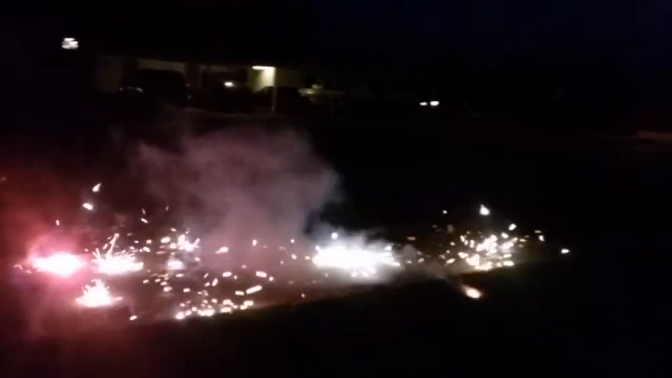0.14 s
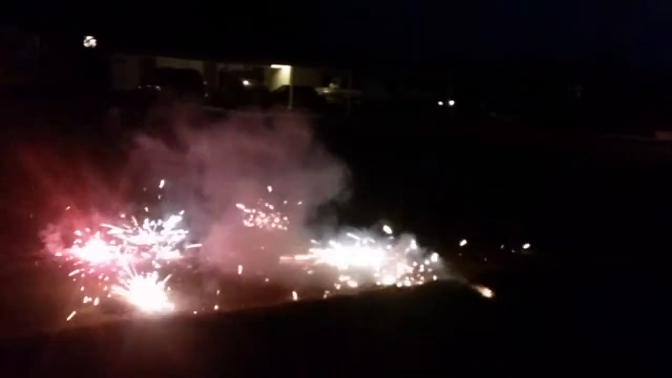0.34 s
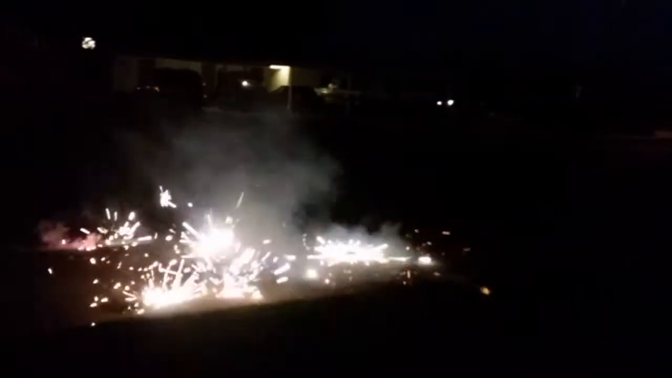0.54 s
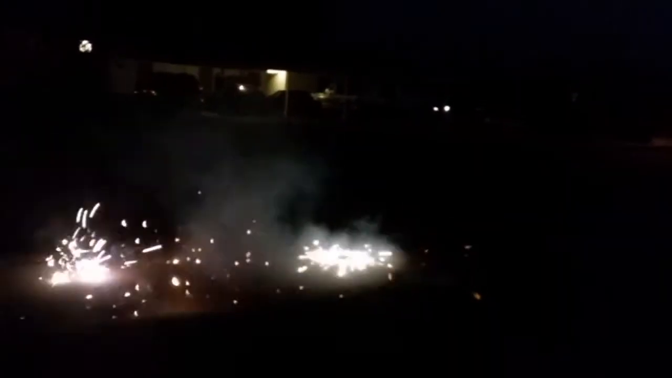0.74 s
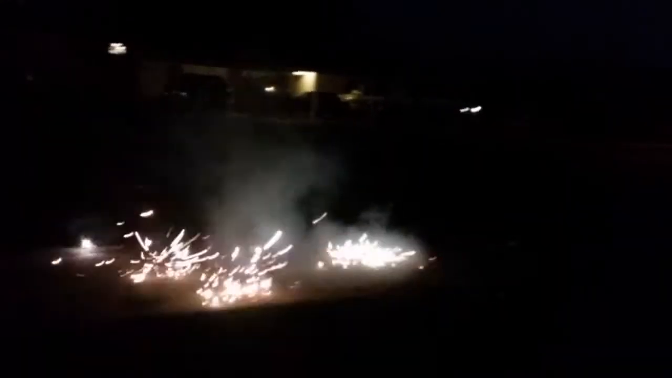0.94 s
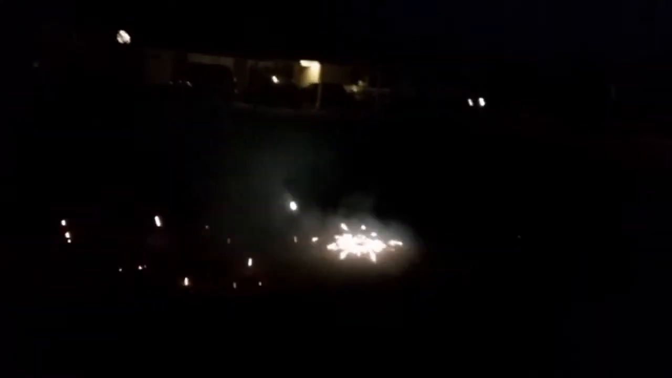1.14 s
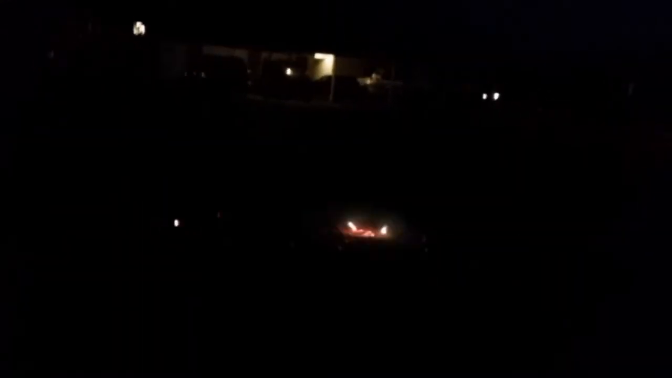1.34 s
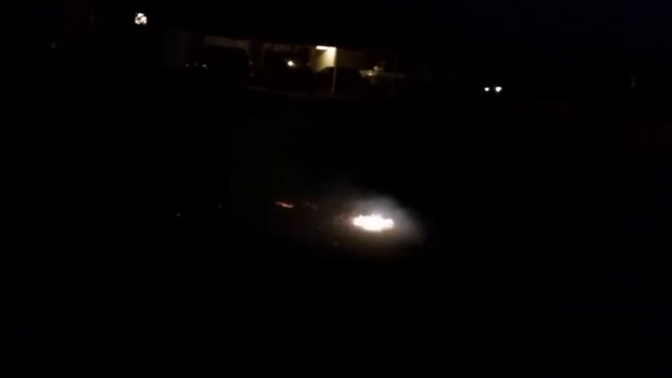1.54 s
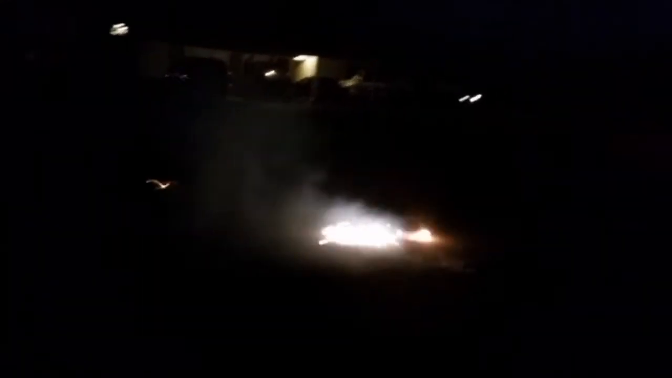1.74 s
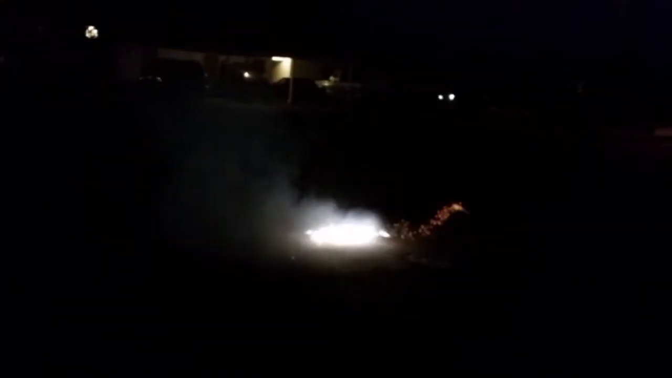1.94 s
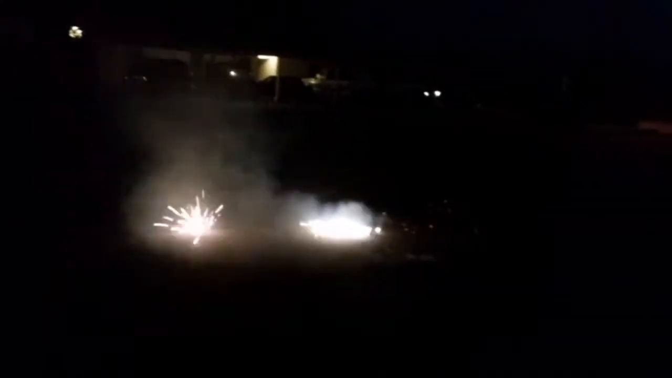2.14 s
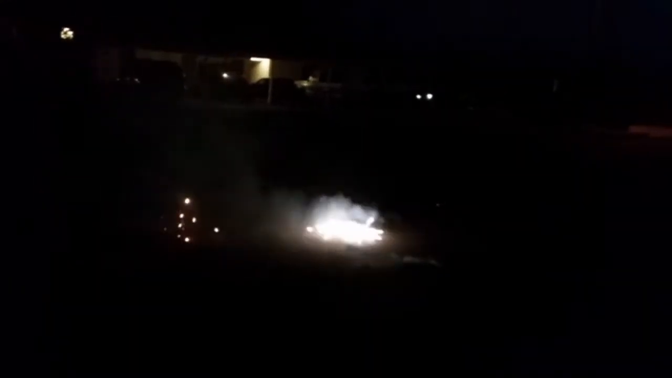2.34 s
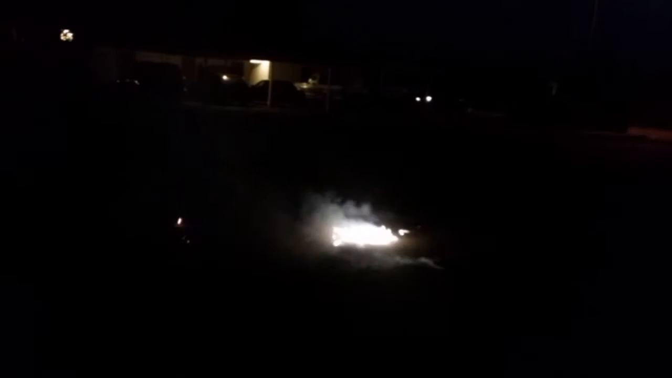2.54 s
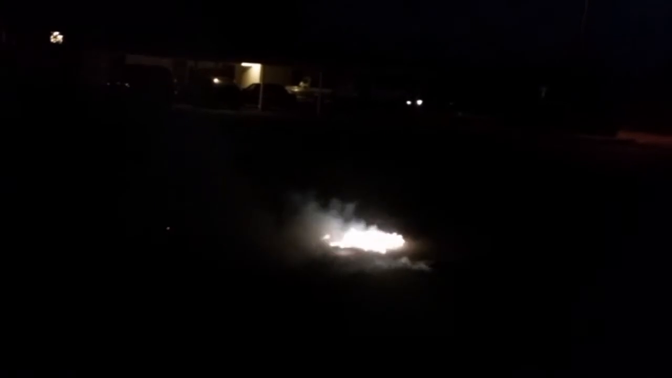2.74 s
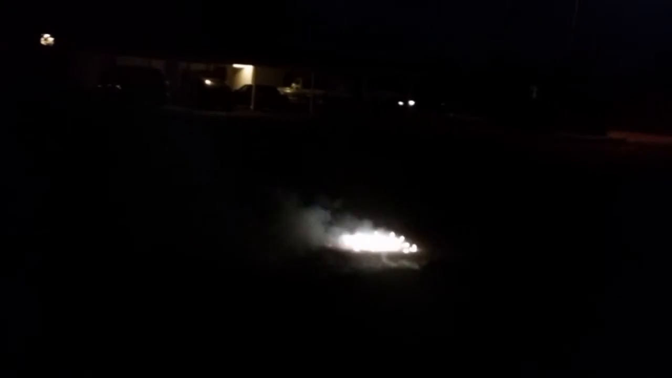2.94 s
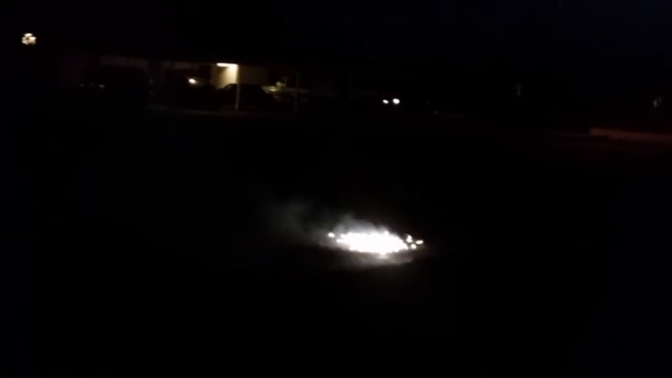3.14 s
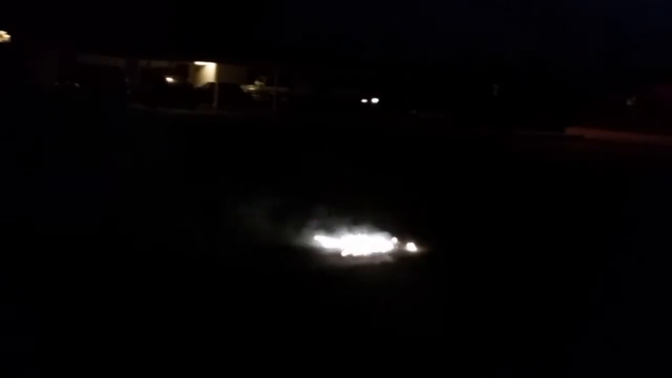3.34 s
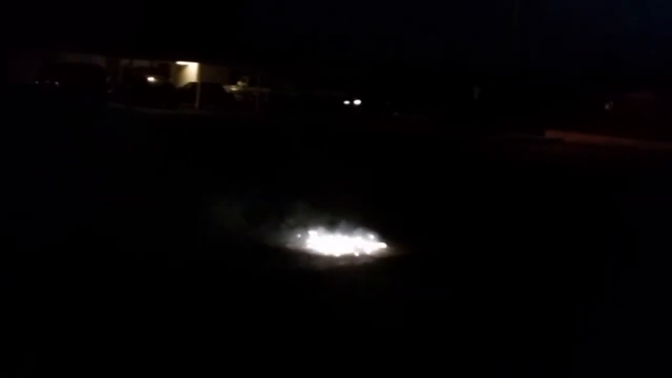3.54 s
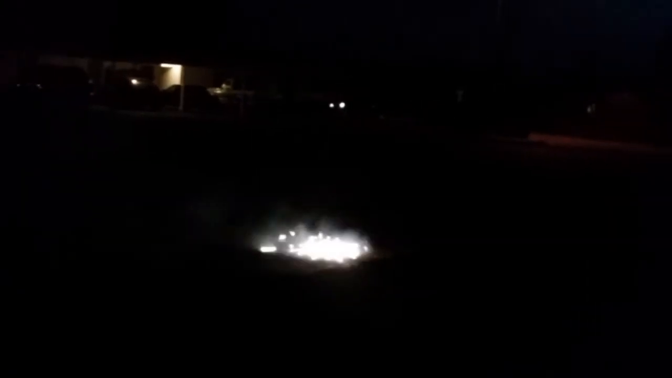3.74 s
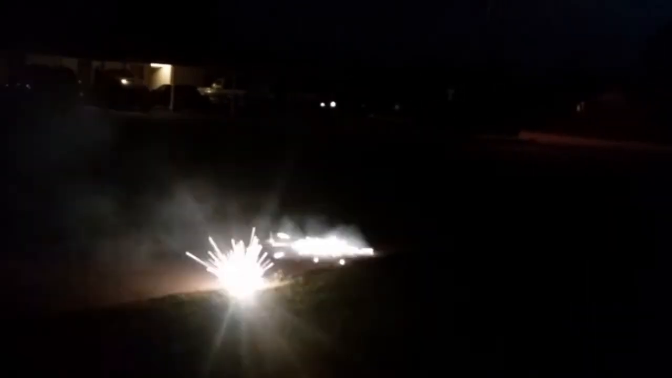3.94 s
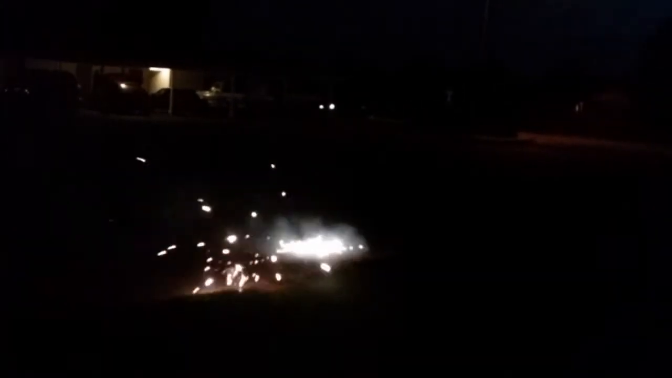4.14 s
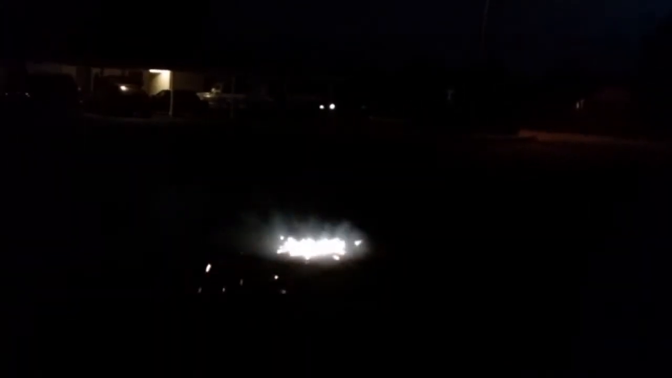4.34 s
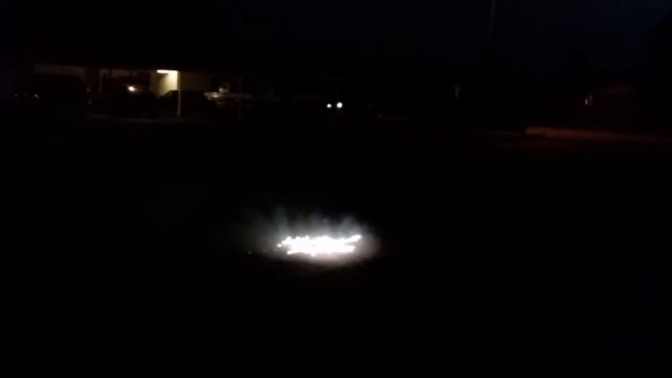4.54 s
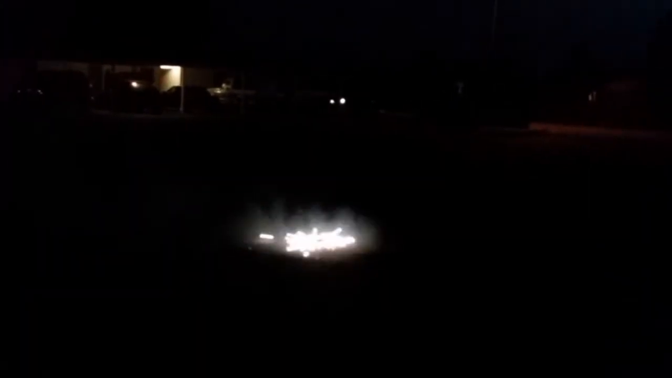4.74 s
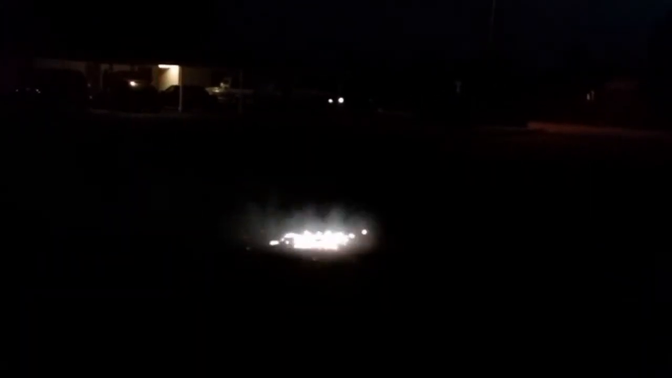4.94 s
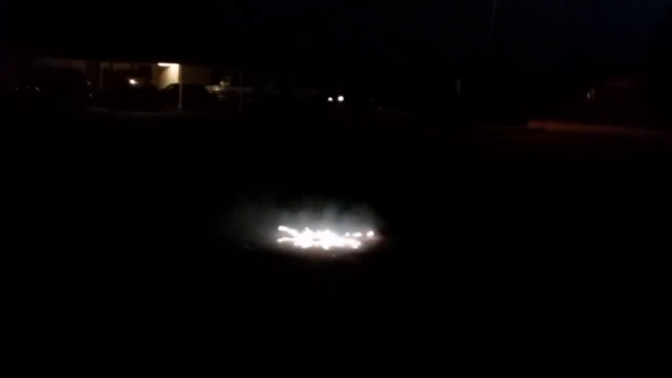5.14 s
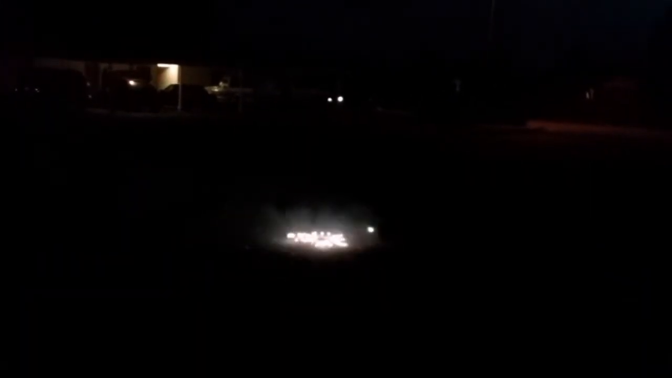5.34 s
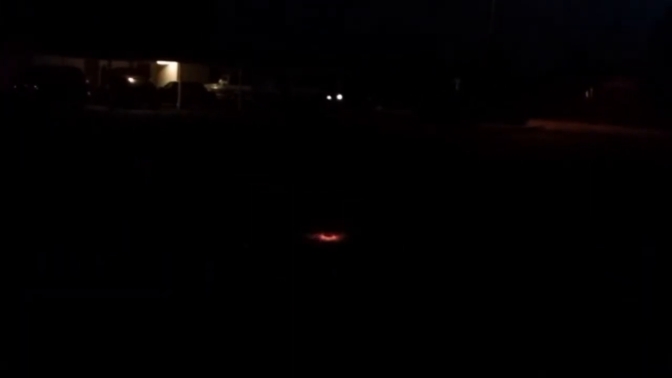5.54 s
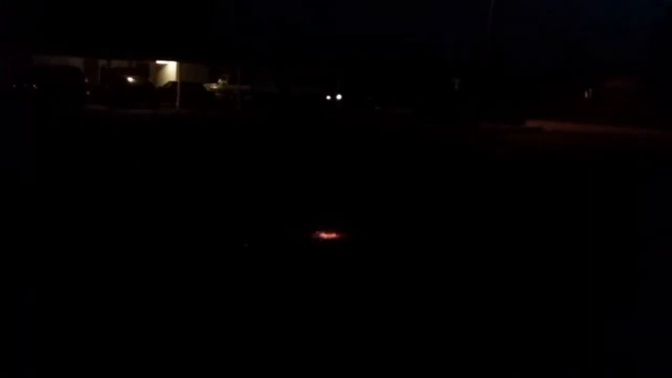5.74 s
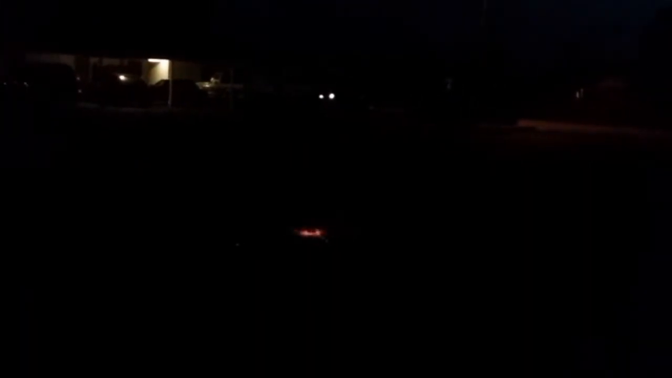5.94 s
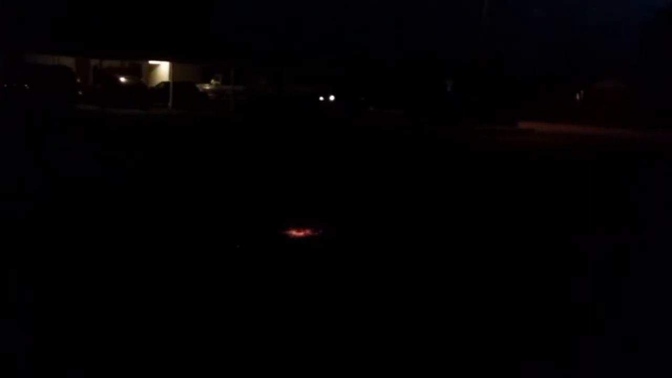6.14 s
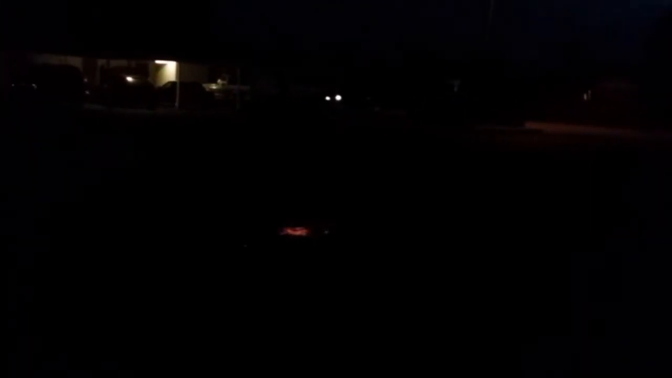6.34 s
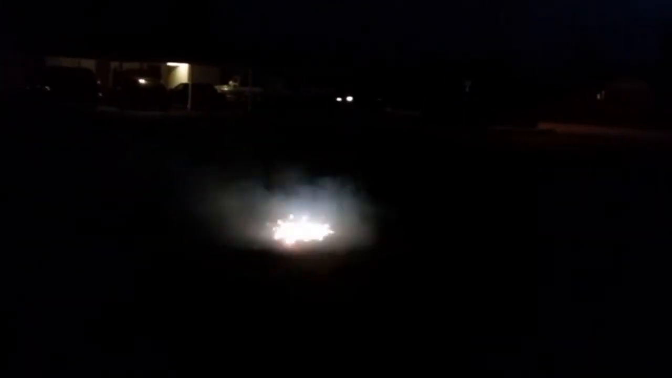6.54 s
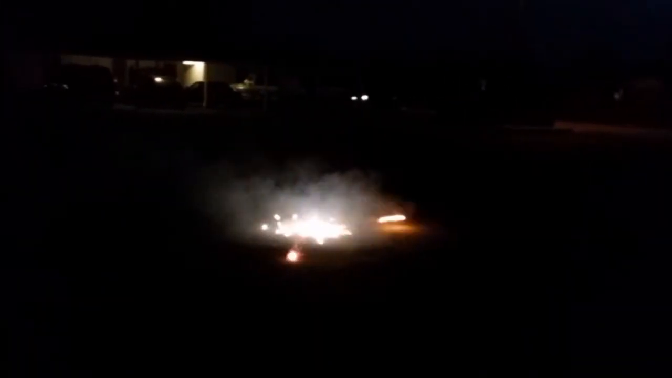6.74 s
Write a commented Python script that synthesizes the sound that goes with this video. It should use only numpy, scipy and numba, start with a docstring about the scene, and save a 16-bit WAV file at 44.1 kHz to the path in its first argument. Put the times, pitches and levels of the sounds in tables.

```python
"""A piercing whistle, already sounding, opens three burns of a ground spinner on a lawn at night. Its pitch
sinks as the empty part of the tube grows, and lifts as a charge runs out. The circling nozzle wobbles pitch
(Doppler) and loudness (beam) each turn; its gas jet is shaped noise. The casing ticks, other fireworks crackle,
a charge pops alight, a low hum follows the spin and houses echo, in faint outdoor air. Two microphones hear it
unequally; a clipping converter folds overtones down and a limiter follows."""
import sys
import numpy as np
from scipy import signal
from scipy.fft import rfft, irfft, next_fast_len
from scipy.io import wavfile
from scipy.ndimage import uniform_filter1d
from numba import njit

SR = 44100
rng = np.random.default_rng(int(sys.argv[2]) if len(sys.argv) > 2 else 0)


def inscribe(sig):
    """Save sig as 16-bit PCM at rate SR to the path in sys.argv[1].

    A 1-D sig is mono; a 2-D sig holds one channel per row.
    Samples are clipped to [-1, 1] before scaling.
    """
    pcm = np.round(np.clip(np.atleast_2d(sig).T, -1, 1) * 32767)
    wavfile.write(sys.argv[1], SR, pcm.astype(np.int16))


def nominal_scale(level):
    """Amplitude ratio for a level in decibels (scalar or array-like)."""
    x = np.asarray(level, float) / 20
    return 10 ** x


N = 299880  # samples


def curve(table, at):
    """Linear interpolation: every later column of a table read along its first column."""
    first, *columns = np.transpose(table)
    return [np.interp(at, first, c) for c in columns]


def colour(x, points):
    """Spectral shaping: a zero-phase filter through (frequency [Hz], gain [dB]) on a log axis."""
    hz, db = np.transpose(points)
    n = next_fast_len(x.shape[-1] + 4096)
    f = np.arange(n // 2 + 1) * SR / n + 1  # the 1 Hz offset keeps the log finite
    gain = nominal_scale(np.interp(np.log(f), np.log(hz), db))
    return irfft(rfft(x, n) * gain, n)[..., :x.shape[-1]]


def level(x, db):
    """Power normalisation: scale to an rms level [dB]."""
    return x * nominal_scale(db) / np.sqrt(np.mean(x ** 2))


def walk(rate):
    """Band-limited fluctuation: random values held 1 / rate s and averaged twice; spread near 1."""
    hold = int(SR / rate)
    steps = np.repeat(rng.standard_normal(N // hold + 1), hold)
    return 1.3 * uniform_filter1d(uniform_filter1d(steps, hold), hold)[:N]


def burns():
    """Tube resonance and rotation: pitch, turns, nozzle speed, level, hand turn, dying share and gate."""
    # the empty part of the tube grows, so the tone sinks; the second burn stumbles just after lighting
    # and the tone lifts as a charge runs out: (time [s], frequency [Hz])
    pitch = [(0, 3017), (.05, 3062), (.11, 2909), (.22, 2777), (.55, 2630), (1.36, 2378), (1.44, 2498),
             (1.49, 2585), (1.74, 2585), (1.745, 4380), (1.78, 4290), (1.802, 3950), (1.826, 3900),
             (1.84, 4190), (1.875, 4430), (1.93, 4440), (2.0, 4320), (2.3, 4200), (2.7, 3760), (2.95, 3680),
             (3.2, 3400), (3.45, 3200), (4.2, 2810), (4.75, 2582), (5.12, 2490), (5.52, 2395), (5.58, 2523),
             (6.61, 2523), (6.62, 4440), (6.8, 4355)]
    # the spinner slows on the grass and speeds up as it gets lighter:
    # (time [s], spin rate [turns/s], radius of the nozzle's circle [cm])
    spin = [(0, 25, 9), (.17, 28, 4.3), (.66, 31.5, 5.1), (1.36, 35.35, 4.7), (1.54, 31.1, 5.2),
            (1.84, 25.08, 0), (1.87, 25.08, 3.4), (2.05, 27.04, 3), (2.3, 24.29, 3.8), (2.6, 23.39, 6),
            (2.95, 21.4, 6.3), (3.04, 21.21, 3.2), (3.3, 20.66, 5.6), (3.7, 21.63, 5.1), (4.0, 25.26, 5.3),
            (4.6, 31.99, 5.4), (5.4, 39.21, 4.9), (5.63, 40.2, 4.3), (6.62, 23, 1.6), (6.8, 27.5, 1.5)]
    # burns: (lit [s], out [s], nozzle angle when first heard [turns], level [dB], turn of the hand [rad])
    charges = [(-2.1, 1.535, .41, 1.5, -.35), (1.749, 5.637, .47, 0, 0), (6.629, 7.5, .24, 8, 1.3)]
    catch_db, catch_s = -50, .003  # the tone swells out of near silence
    dying_s, dying_tone_db = .14, -18  # the tone fades as the charge runs out
    t = np.arange(N) / SR
    hz, = curve(pitch, t)
    rate, radius_cm = curve(spin, t)
    rows = np.array(charges)
    lit, out, angle, db, hand = rows[np.searchsorted(rows[:, 0], t) - 1].T
    spun = np.cumsum(rate) / SR
    turns = angle + spun - np.interp(lit, t, spun)
    speed = 2 * np.pi * radius_cm / 100 * rate  # m/s
    dying = np.clip(1 - (out - t) / dying_s, 0, 1)
    db = db + catch_db * np.exp(-(t - lit) / catch_s) + dying_tone_db * dying ** 3.5
    burning = np.clip((out - t) / .006, 0, 1)
    return hz, turns, speed, db, hand, dying, burning


def whistle(hz, turns, speed, lead, dying):
    """Doppler shift and directivity of a circling tube: left and right tone, and one without the beam."""
    # a higher tone beams more sharply:
    # (tube tone [Hz], swing once a turn [ratio], swing twice a turn [ratio], overtone level [dB])
    directivity = [(2310, 0.046, 0.1, 10), (2756, 0.071, 0.17, 3), (2847, 0.39, 0.23, 2.5),
                   (3244, 0.22, .15, -14), (3569, 0.12, .4, -9), (3960, 0.15, 0.38, -17),
                   (4240, 0.44, .75, -18.5)]
    # overtones of the tube:
    # (multiple of the tone, level [dB], beam swing [ratio], loudest at [fraction of a turn])
    overtones = [(2, -21.5, 0.55, 0.37), (3, -28.5, 0.8, 0.3), (4, -29, 1, 0.33)]
    peak_once, peak_twice = 0.16, 0.13  # where the beam peaks, fraction of a turn
    dying_overtone_db = -12  # as the charge runs out, per step above the octave
    once, twice, overtone_db = curve(directivity, hz)
    turn = 2 * np.pi * turns
    doppler = speed / 343 * np.cos(turn)
    # uneven burning shakes the pitch a little
    heard = hz * (1 + doppler + .003 * walk(150) + 0.0087 * twice * walk(70))
    # a short, freshly lit tube sings hoarsely
    heard = heard * (1 + .008 * twice * walk(500))
    phase = 2 * np.pi * np.cumsum(heard) / SR
    beam = 1 - 0.54 * twice + once * np.cos(turn - 2 * np.pi * peak_once)
    beam = beam + twice * np.cos(2 * (turn - 2 * np.pi * peak_twice)) + 0.078 * walk(120)
    both = phase + np.array([lead, np.zeros(N)])
    # a small part a quarter cycle ahead, stronger for a higher tone, part fills the nulls
    tone = beam * np.sin(both) + 0.12 * twice * np.cos(both)
    plain = np.sin(phase)
    for k, db, swing, at in overtones:
        lobe = nominal_scale(db + overtone_db + (k - 2) * dying_overtone_db * dying + 1.7 * walk(90))
        lobe = lobe * (k * heard < .45 * SR)  # silent near and above half the sample rate
        sweep = 1 + swing * np.cos(turn - 2 * np.pi * at)
        sweep = sweep + 0.32 * np.cos(2 * turn - 4 * np.pi * at)
        tone = tone + lobe * sweep * np.sin(k * both + 0.57 * k)
        plain = plain + lobe * np.sin(k * phase)
    return tone, plain, turn


def gas(dying, burning):
    """Turbulent jet noise: broadband hiss with a fine sputter, following the strength of the jet."""
    # spectrum of the hiss: (frequency [Hz], gain [dB])
    spectrum = [(60, -18), (300, -18), (800, -11), (1500, -8), (2500, -6), (4000, -13), (6000, -15.5),
                (12000, -13.5)]
    # strength of the gas jet: (time [s], level [dB])
    strength = [(0, -50.5), (.4, -48), (1.4, -52.5), (1.76, -54), (2.05, -57), (2.25, -52), (2.42, -59),
                (2.62, -55), (2.8, -48), (3.2, -46), (3.4, -41), (3.8, -48), (5.5, -55.5), (6.65, -50),
                (6.8, -49)]
    dying_jet_db = -25
    sputter = nominal_scale(0.83 * walk(200))
    hiss = level(colour(rng.standard_normal((2, N)), spectrum) * sputter, 10)
    jet_db, = curve(strength, np.arange(N) / SR)
    return hiss * nominal_scale(jet_db + dying_jet_db * dying ** 2.2) * uniform_filter1d(burning, size=200)


def ticks():
    """Impulsive radiation: casing ticks and pops, each a few milliseconds of band-passed grit."""
    # the casing ticks: (time [s], relative peak level [dB])
    casing = [(1.596, -43), (1.632, -46), (1.689, -40), (5.693, -52), (5.737, -41), (5.766, -44),
              (5.785, -46), (5.848, -40.5), (5.936, -46.5), (5.999, -46), (6.044, -43), (6.107, -46),
              (6.195, -46), (6.275, -48), (6.338, -47), (6.42, -49.5), (6.491, -44.5), (6.554, -47),
              (6.588, -53)]
    # pops: crackle of other fireworks near the start, then the third burn catching: (time [s], relative peak
    # level [dB])
    pops = [(0.165, -30), (0.172, -26), (0.227, -29), (6.612, -46), (6.619, -30)]
    gain_db = .7
    out, t = np.zeros(N + 1024), np.arange(1024) / SR
    events = [(*row, 2060) for row in casing] + [(*row, 2000) for row in pops]  # nominal band [Hz]
    envelope = (t / .0015) * np.exp(-t / .0018)
    grit = rng.standard_normal((len(events), 1024))
    for (s, db, hz), g in zip(events, grit):
        hz = hz * (1 + .03 * g[0])  # the band scatters from event to event
        band = signal.butter(3, [.62 * hz, 1.2 * hz], "band", fs=SR, output="sos")
        burst = signal.sosfilt(band, g * envelope)
        i = int(s * SR)
        out[i:i + 1024] += nominal_scale(db + gain_db) * burst / np.abs(burst).max()
    return out[:N]


def hum(turn, speed):
    """Rotational tone: a wavering hum at three times the spin rate, growing with speed squared."""
    strength = nominal_scale(-44.5 + 3.0 * walk(25)) * (speed / 11) ** 2
    return strength * np.sin(3 * turn + 1.4 * walk(40))


def houses(x):
    """Diffuse reflection: decaying echoes from distant walls, partly shared by both microphones."""
    echo_db, t60_s, onset_s = -28.5, 1.1, 0.071
    t = np.arange(int(2 * SR)) / SR
    shared, own = rng.standard_normal(len(t)), rng.standard_normal((2, len(t)))
    rise = np.clip(t / onset_s - .3, 0, 1)  # silent at first, full at 1.3 onset times
    tail = (shared + 0.88 * own) * nominal_scale(-60 * t / t60_s) * rise
    tail = tail * nominal_scale(echo_db) / np.sqrt(np.sum(tail ** 2, axis=1, keepdims=True))
    dulled = colour(x, [(3000, 1.5), (5000, -6), (8000, -21)])
    return signal.fftconvolve(dulled[None], tail, axes=1)[:, :N]


def night():
    """Ambient noise and coherence: faint outdoor air whose bass is common to both channels."""
    # spectrum of the air: (frequency [Hz], gain [dB])
    air = [(24, -51), (40, -21.5), (117, -1.5), (251, -14), (552, -17.5), (1080, -13), (1540, -17),
           (2050, -5.5), (5210, -11.5), (12000, -46), (15600, -69), (22000, -120)]
    bass = colour(rng.standard_normal(N), [(300, 10), (600, -24.5)])
    rest = colour(rng.standard_normal((2, N)), [(300, 3.5), (800, 5.5)])
    return level(colour(bass + rest, air), -65.5)


def scene():
    """Superposition: the whistle at each port plus diffuse sound, with unequal port responses."""
    # how each microphone port takes the tone:
    # (tube tone [Hz], left level [dB], right level [dB], left leads by [rad])
    ports = [(2400, -9, -3, -.3), (2600, -8.5, 0, -.65), (2730, -9.5, 1, -.9), (2850, -12.5, 2, -.9),
             (3000, -9, 4.5, -.3), (3200, -6, 10.5, -.95), (3400, -2.5, 11, -1.6), (3650, -.5, 11, -2.4),
             (3870, -10, 9, -1.9), (4080, -9, 9, -1.8), (4190, -6.5, 18, -2.3), (4360, -15, 14, -2)]
    # right port for diffuse sound: (frequency [Hz], gain [dB])
    right_port = [(200, 12), (600, 17.5), (1300, 17), (2400, 15.5), (4400, 25), (9000, 14.5), (15000, -4)]
    # shading of the left port: (frequency [Hz], gain [dB])
    left_shade = [(4600, 1.5), (6000, -6), (9000, -8), (12000, -34)]
    hz, turns, speed, db, hand, dying, burning = burns()
    left_db, right_db, lead = curve(ports, hz)
    tone, plain, turn = whistle(hz, turns, speed, lead + hand, dying)
    direct = tone * nominal_scale(db + np.array([left_db, right_db])) * burning
    jet = gas(dying, burning)
    toward_houses = plain * nominal_scale(db + left_db) * burning + 2.1 * jet[0]
    diffuse = jet + ticks() + houses(toward_houses) + night()
    diffuse[1] = colour(diffuse[1], right_port) + hum(turn, speed) * burning
    both = direct + diffuse
    both[0] = colour(both[0], left_shade)
    return both


@njit
def limit(x, top, ratio, attack, release):
    """Gain reduction: a peak follower, reading 16 samples ahead, turns down whatever exceeds top."""
    y, e = np.empty(len(x)), 1e-9
    for i in range(len(x)):
        ahead = abs(x[min(i + 16, len(x) - 1)])
        e += (ahead - e) * (attack if ahead > e else release)  # fractions per sample
        y[i] = x[i] * min(1., top / e) ** (1 - 1 / ratio)
    return y


def roll_off(x):
    """The treble ends steeply here."""
    return signal.sosfilt(signal.butter(12, 16990, fs=SR, output="sos"), x)


def record(dry):
    """Nonlinear distortion and aliasing: clipping at 48 kHz folds high overtones down; then limiting."""
    # tone shaping of the recorder: (frequency [Hz], gain [dB])
    recorder = [(30, -38), (50, -27), (100, -13), (250, -12), (2500, -4.5), (3000, -4.8), (3700, -7),
                (4300, -10), (6500, -10.5), (9000, -8), (11000, -8), (13000, -6.5), (15700, -12.5),
                (16300, -37.5)]
    up, down = 160, 147  # 44.1 to 48 kHz
    clip, knee = 0.72, 14  # amplitude ceiling, sharpness of its knee
    clipped = signal.resample_poly(dry, up, down, axis=1)
    clipped = clipped / (1 + np.abs(clipped / clip) ** knee) ** (1 / knee)
    x = signal.resample_poly(clipped, down, up, axis=1)[:, :N]
    top = float(nominal_scale(-3.5))
    limited = np.array([limit(c, top, 2.8, 0.24, 0.006) for c in x])
    mix = colour(limited, recorder)
    return roll_off(mix)


dry = scene()
out = record(dry)
inscribe(out)
```